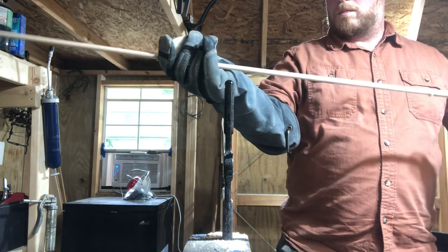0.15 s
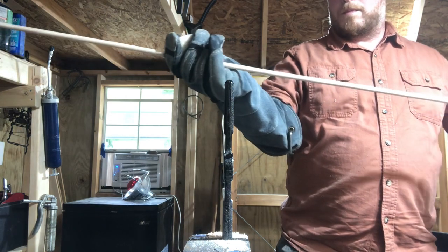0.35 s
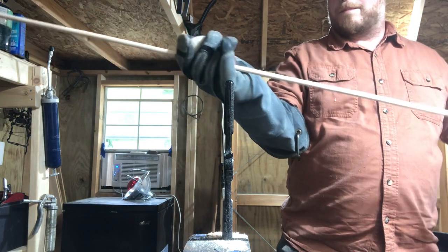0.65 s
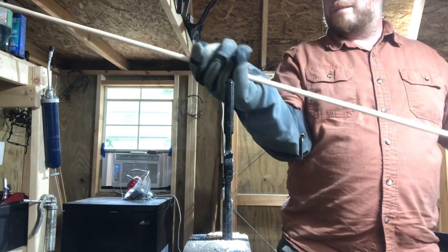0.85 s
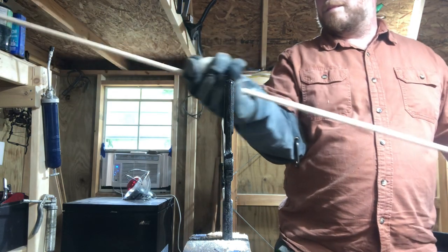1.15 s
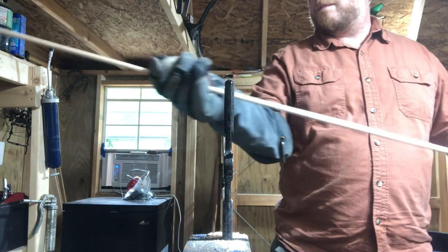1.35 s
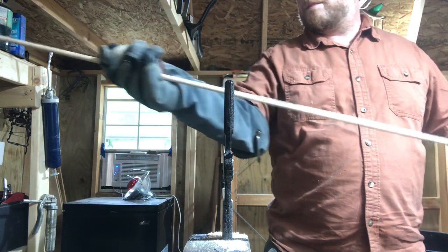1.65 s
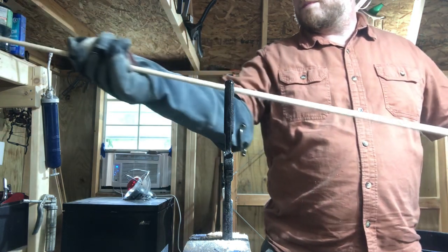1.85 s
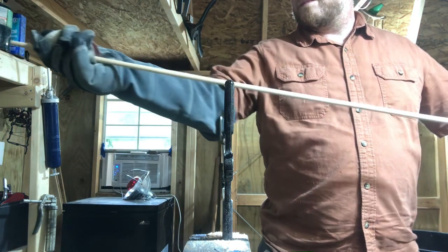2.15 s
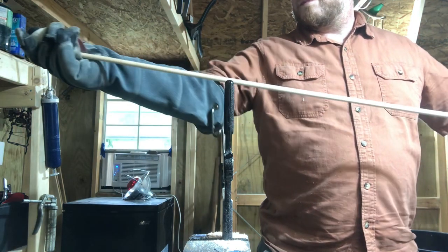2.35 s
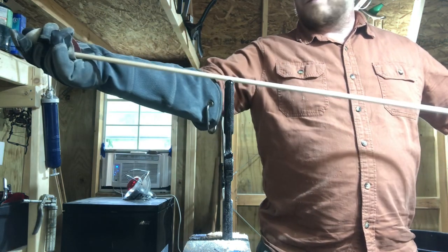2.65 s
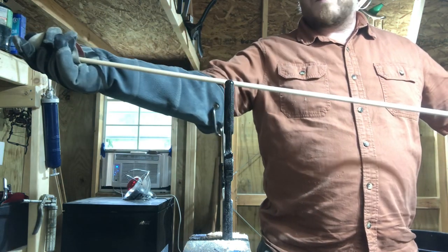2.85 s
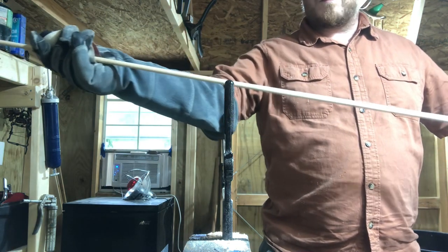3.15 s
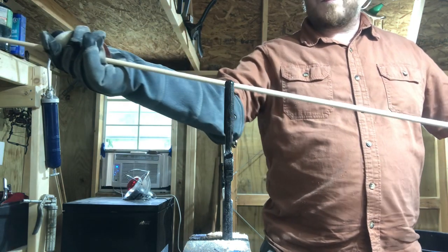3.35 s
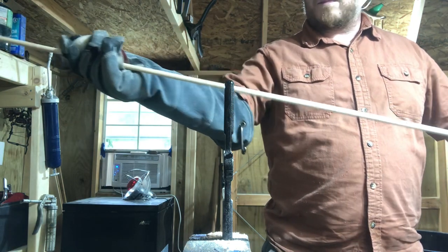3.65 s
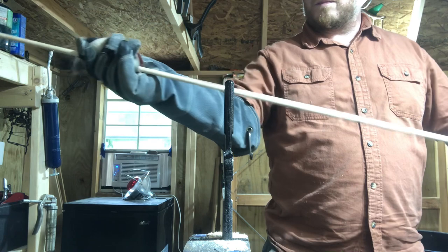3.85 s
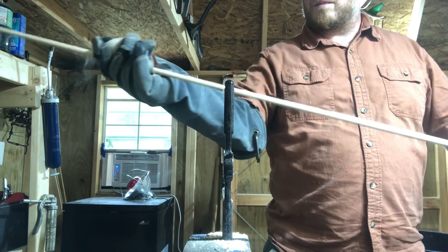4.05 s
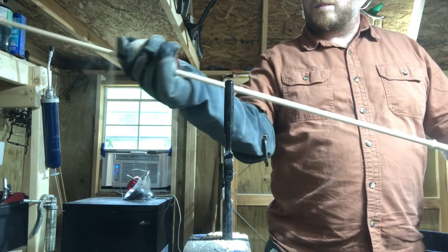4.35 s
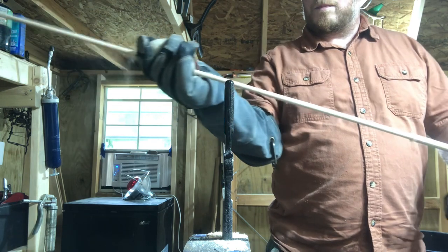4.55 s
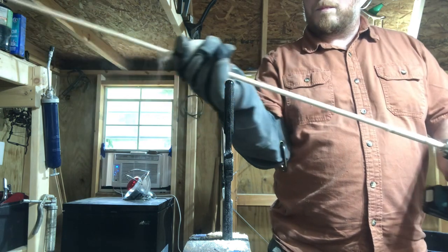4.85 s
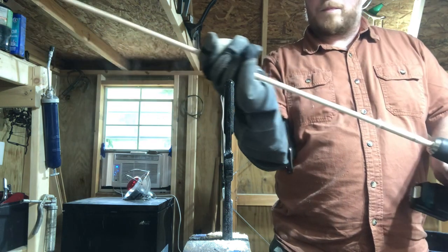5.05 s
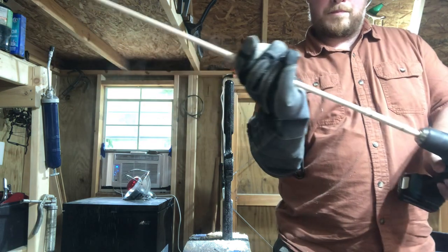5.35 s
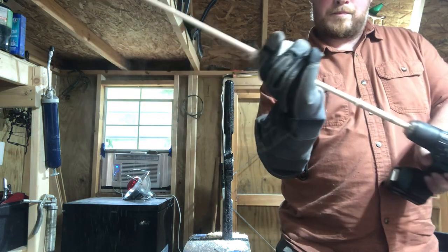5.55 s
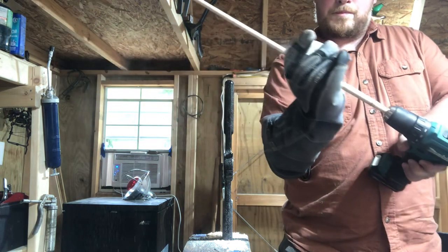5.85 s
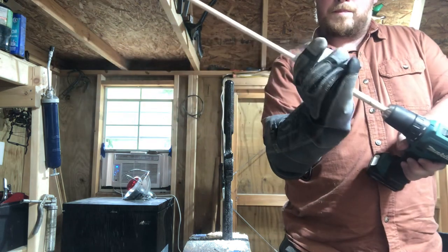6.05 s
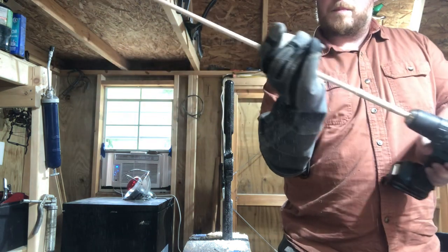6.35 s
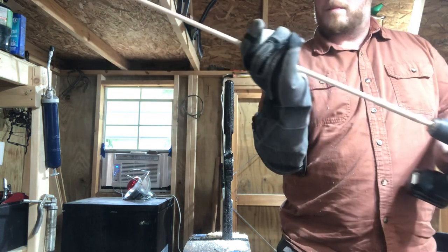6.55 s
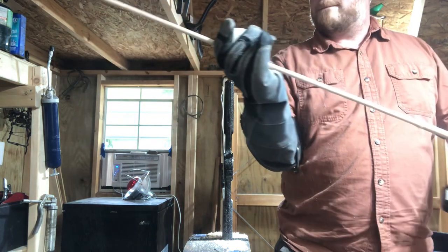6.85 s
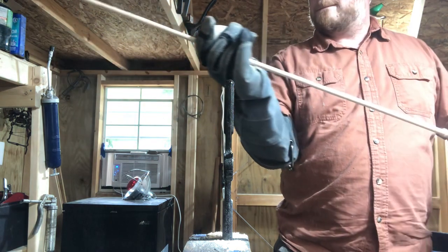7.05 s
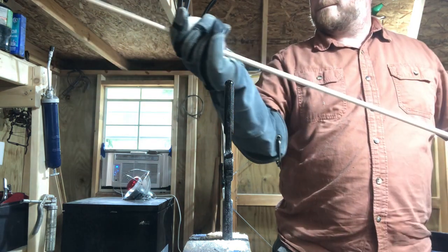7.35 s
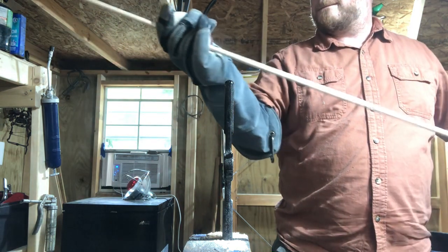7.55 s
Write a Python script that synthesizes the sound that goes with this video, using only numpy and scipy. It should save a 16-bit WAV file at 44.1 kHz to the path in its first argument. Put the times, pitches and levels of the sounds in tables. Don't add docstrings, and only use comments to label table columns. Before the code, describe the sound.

A cordless drill cuts out, loose ticks and paper rustle follow, then it clicks back on, spinning a dowel through sandpaper with gritty whining roar.

```python
import sys
import numpy as np
from scipy import signal
from scipy.fft import rfft, irfft, next_fast_len
from scipy.io import wavfile
from scipy.ndimage import uniform_filter1d, map_coordinates

SR = 44100
rng = np.random.default_rng(int(sys.argv[2]) if len(sys.argv) > 2 else 0)


def volts_from_db(level):
    exponent = np.asarray(level, float) / 20
    return 10 ** exponent


def unload_audio(sound):
    columns = np.transpose(np.atleast_2d(sound))
    steps = np.round(np.clip(columns, -1, 1) * 32767)
    wavfile.write(sys.argv[1], SR, steps.astype(np.int16))


N = 340011
TIME = np.arange(N) / SR
PINION_TEETH = 12
CHUCK_GEARING = 15

# pitch_hz, density_db [dB per Hz]
PAPER_COLOUR = [(350, -32), (600, -1), (1650, -4), (2400, -8.5), (3230, -14), (4970, -11), (7300, -9),
                (8300, -22), (10500, -28), (11800, -36), (15700, -44)]


def unit(x):
    return x / np.sqrt(np.mean(x ** 2) + 1e-20)


def along(points, hz):
    f, v = np.transpose(points)
    return np.interp(np.log(hz + 1), np.log(f + 1), v)


def curves(rows):
    s, *columns = np.transpose(rows)
    return [np.interp(TIME, s, column) for column in columns]


def wobble(rate):
    knots = rng.standard_normal(int(N * rate / SR) + 4)
    return map_coordinates(knots, [TIME * rate])


def filtered(x, response):
    size = next_fast_len(N + SR // 2)
    hz = np.fft.rfftfreq(size, 1 / SR)
    return irfft(rfft(x, size) * response(hz), size)[..., :N]


def patches(shape, bins):
    field = uniform_filter1d(rng.standard_normal(shape), size=bins, axis=0)
    return unit(uniform_filter1d(field, size=14, axis=1))


def drill():
    # time_s, mesh_hz
    mesh_pitch = [(0, 3720), (1.3, 3790), (1.7, 3800), (1.9, 3815), (2.45, 3822), (2.66, 3842), (2.9, 3796),
                  (3.3, 3799), (4.0, 3768), (4.9, 3763), (5.2, 3775), (5.45, 3740), (5.75, 3760),
                  (6.08, 3699), (6.3, 3744), (6.75, 3755), (7.2, 3745), (7.71, 3710)]
    # time_s, level_db
    whine_level = [(.3, -60), (1.3, -44), (1.55, -46), (1.8, -37), (2.75, -36.5), (3.3, -38.5), (3.6, -43),
                   (3.8, -37), (3.9, -48), (4.3, -55), (4.55, -35), (5.2, -33), (5.5, -39), (6.2, -41),
                   (6.6, -35), (6.97, -35), (7.1, -45), (7.71, -51)]
    # centre_s, change_db, half_length_s
    shades = [(2.1, -3, .07), (2.95, -8, .06), (3.4, -7, .03), (3.6, -5, .05), (5.63, -7, .03),
              (5.83, -12, .06), (6.19, -7, .04), (6.47, -4, .04), (6.85, -5, .03), (7.22, -9, .05)]
    # time_s, facing [0-1]
    swing = [
        (0, 0.34),
        (4.3, 0),
        (4.75, 1),
        (7.71, 0.53),
    ]

    speed, coasting = throttle()
    mesh_hz = curves(mesh_pitch)[0] * speed
    whine_db = curves(whine_level)[0]
    for s, db, half_s in shades:
        whine_db = whine_db + db * np.exp(-((TIME - s) / half_s) ** 2)
    whine_db = whine_db - 18 * coasting - 70 * (1 - speed)
    turns = np.cumsum(mesh_hz) / PINION_TEETH / SR
    facing = np.clip(curves(swing)[0], 0, 1)
    running = np.clip(mesh_hz / 3700, 0, 1) ** 6
    return whine(turns, whine_db, running, facing) + sanding(turns, facing, effort(speed))


def throttle():
    # release_s, press_s, speed_lost [share], slowing_s
    pauses = [
        (.316, 1.088, 1, .04),
        (4.29, 4.616, .22, .13),
    ]
    pick_up_s = 0.043
    speed, coasting = np.ones(N), np.zeros(N)
    for off, on, lost, slowing_s in pauses:
        fall = lost * (1 - np.exp(-np.clip(TIME - off, 0, on - off) / slowing_s))
        speed = speed - fall * np.exp(-np.clip(TIME - on, 0, None) / pick_up_s)
        coasting = coasting + (TIME > off) * (TIME < on)
    return np.clip(speed, 1e-4, 1), uniform_filter1d(coasting, size=900)


def effort(speed):
    # time_s, grip_db [on the paper], whip_db [of the free dowel]
    hold = [(0, -1.5, -1.5), (.32, -3.5, 1.5), (1.2, 0.5, 1), (1.55, 1, 1), (2.07, -1.5, -2),
            (2.6, -2.5, 1), (2.85, -1.5, 0.5), (3.3, -1, 0.5), (4.1, 0, 2.5), (4.5, 0, 1.5), (4.8, 0, 0.5),
            (5.6, 0, 2), (5.85, -1, 0.5), (6.05, -0.5, 0.5), (6.3, -.5, -0.5), (7.0, -1, -3),
            (7.3, -0.5, -0.5), (7.71, 0, 0)]
    # time_s, jolt_db
    jolts = [(.316, 4.5), (1.1, 6), (1.17, 6.5), (1.28, 3), (1.42, 4), (2.82, 7), (3.16, 0), (4.22, 2.5),
             (5.15, 0), (5.59, -2), (5.87, 3), (6.05, 7.5), (6.16, 5), (7.28, 3)]
    # level_db, by_grip [dB per dB], by_whip [dB per dB], speed_power, jolt_share
    layers = [
        (-38.5, 0.5, 1.26, 0.96, 1),
        (-35, .5, 0.93, 1.36, 0.11),
        (-32, 1.27, 0.41, 1.35, 0.12),
        (-31, 1.49, -0.05, 1.57, 0.06),
    ]
    jolt_s, uneven_db = 0.012, 0.61

    grip, whip = curves(hold)
    jolt = np.zeros(N)
    for s, db in jolts:
        jolt += db * np.exp(-((TIME - s) / jolt_s) ** 2) * (speed > 0.01)
    levels = []
    for db, by_grip, by_whip, power, share in layers:
        pressed = db + by_grip * grip + by_whip * whip
        driven = power * 20 * np.log10(speed) + share * jolt
        levels.append(pressed + driven + uneven_db * wobble(22))
    return levels


def whine(turns, whine_db, running, facing):
    # order [per motor turn], away_db, facing_db
    orders = [(13 / 15, -63, -68), (14 / 15, -70, -65), (1, -65, -62), (16 / 15, -70, -66), (2, -70, -60),
              (31 / 15, -70, -61), (5, -58, -47), (6, -58, -48), (23, -62, -52), (24, -54, -53),
              (30, -72, -63), (36, -78, -72)]
    mesh_phase = 2 * np.pi * PINION_TEETH * turns + 0.35 * wobble(50)
    tones = volts_from_db(whine_db + 2.5 + 1.7 * wobble(45)) * np.sin(mesh_phase)
    for order, away_db, facing_db in orders:
        level_db = away_db + (facing_db - away_db) * facing + 3 * wobble(8)
        tone = np.sin(2 * np.pi * (order * turns + rng.random()))
        tones = tones + running * volts_from_db(level_db + 3) * tone
    return tones


def sanding(turns, facing, levels):
    # pitch_hz, density_db [dB per Hz]
    colour = [(53, -66), (90, -32.5), (301, -13.5), (382, -15.5), (1010, -5), (1120, -7.5), (1850, -1),
              (2100, -5.5), (3230, -3), (3760, -1), (4370, -5), (6880, -3), (8360, -14.5), (10600, -16.5),
              (15600, -37.5)]
    # pitch_hz, width_hz, away_db, facing_db
    body = [(257, 89, 1, 3), (380, 61, -4.5, -3), (663, 74, 0.5, 2.5), (1020, 54, 4.5, 7),
            (1272, 290, 5, 6.5), (1490, 37, -3.5, -1.5), (1620, 120, 5, -1), (1850, 220, -1.5, 4.5),
            (2318, 97, 6.5, 2.5), (2620, 87, -0.5, 2.5), (3330, 500, -3, -0.5), (4140, 250, 1, 2.5),
            (4580, 105, 4, 4.5), (4960, 500, 3, 8), (6310, 400, 4.5, 1.5), (7020, 1070, 5, 3),
            (7380, 140, 3.5, 0), (7850, 300, 4.5, 4), (10200, 2700, 4.5, 2), (11700, 2300, 0.5, -6.5),
            (14900, 2000, 8, 5.5), (15800, 800, 2, -2)]
    edges = [
        1400,
        2900,
        5600,
    ]

    def above(hz, edge):
        return 1 / (1 + (edge / (hz + 1)) ** 16)

    def layer_share(hz, k):
        power = np.ones(len(hz))
        if k > 0:
            power = power * above(hz, edges[k - 1])
        if k < len(edges):
            power = power * (1 - above(hz, edges[k]))
        return np.sqrt(power)

    def body_db(hz, column):
        return sum(row[column] / (1 + (2 * (hz - row[0]) / row[1]) ** 2) for row in body)

    chuck = 2 * np.pi * turns / CHUCK_GEARING
    contacts = standing(grit(spread_db=1.9, patchy_db=1), depth_db=1.95)
    out = np.zeros(N)
    for k, level_db in enumerate(levels):
        beat_db = 0.41 * np.sin(chuck + k) + 0.56 * np.sin(2 * chuck + 3 * wobble(2))
        beat_db += 0.4 * np.sin(CHUCK_GEARING * chuck)
        beat_db += 0.1 * wobble(25) + 0.16 * wobble(120)
        rubbed = volts_from_db(beat_db) * np.roll(contacts, k * SR)

        def heard(column):
            return unit(filtered(rubbed, lambda hz: layer_share(hz, k)
                                 * volts_from_db(along(colour, hz) + body_db(hz, column))))

        away, toward = heard(2), heard(3)
        out += volts_from_db(level_db) * (away + (toward - away) * facing)
    return out


def grit(spread_db, patchy_db):
    size_db = spread_db * np.minimum(rng.exponential(size=N), 5)
    contacts = rng.standard_normal(N) * volts_from_db(size_db)
    z = signal.stft(contacts, nperseg=512)[2]
    gain = volts_from_db(patchy_db * patches(z.shape, bins=5))
    return signal.istft(z * gain, nperseg=512)[1][:N]


def standing(x, depth_db):
    z = signal.stft(x, nperseg=2048)[2]
    gain = volts_from_db(depth_db * patches(z.shape, bins=2))
    return signal.istft(z * unit(gain), nperseg=2048)[1][:N]


def trigger():
    # start_s, peak_db, knock_db [re peak], knock_hz, t60_s
    click = [
        (1.0887, -24, -20, 950, .012),
    ]
    # pitch_hz, level_db, t60_s
    clunk = [(668, -13, .07), (1270, -12, .06), (1700, -3, .014), (2050, 0, .014), (5200, -26, .008),
             (7000, -24, .008)]
    buzz_db = curves([(1.074, -95), (1.081, -62), (1.088, -52), (1.091, -95)])[0]
    buzz = volts_from_db(buzz_db) * np.sin(2 * np.pi * 2100 * TIME)
    return buzz + strike(click, clunk, crack=0.58)


def handling():
    # time_s, level_db
    rustle = [(0.36, -57), (0.404, -63), (0.746, -76), (0.96, -78), (0.99, -72), (1.08, -74)]
    # start_s, peak_db, knock_db [dowel, re peak], knock_hz, t60_s
    ticks = [(0.4279, -50, -13, 1020, 0.012), (0.448, -42, -13, 1340, 0.012),
             (0.4716, -35.5, -16, 1620, 0.013), (0.4786, -40, -12, 705, 0.01),
             (0.5083, -40, -8, 705, 0.012), (0.5492, -32, -10, 1660, 0.006), (0.5655, -46, -4, 982, 0.012),
             (0.6444, -57, -8, 759, 0.012), (0.6764, -53, -5, 1880, 0.012), (0.689, -48, -9, 1490, 0.013),
             (0.692, -47, -5, 1890, 0.013), (0.7357, -41.5, -15, 1010, 0.013),
             (0.7434, -55, -13, 703, 0.012), (0.7494, -53, -15, 703, 0.012), (0.7564, -59, -5, 1540, 0.012),
             (0.9757, -59, -4, 1090, 0.012), (0.9854, -58, 0, 805, 0.012)]
    # pitch_hz, level_db, t60_s
    chuck_modes = [(4300, -10, 0.0091), (4900, -5, 0.015), (5400, -5, .008), (6150, 2, .007),
                   (7000, -7, 0.01), (7760, -5, .009), (9400, -12, .006), (10350, -8, .008)]
    level_db = curves([(0.34, -95), *rustle, (1.12, -95)])[0]
    paper = unit(filtered(grit(spread_db=2, patchy_db=1.5), lambda hz: volts_from_db(along(PAPER_COLOUR, hz))))
    return volts_from_db(level_db + 1.7 * wobble(60.8)) * paper + strike(ticks, chuck_modes, crack=1.8)


def strike(hits, modes, crack):
    out, t = np.zeros(N + SR), np.arange(SR // 8) / SR
    snap = unit(filtered(rng.standard_normal(N),
                         lambda hz: volts_from_db(along(PAPER_COLOUR, hz)) * hz / (hz + 3000)))
    attack = 1 - np.exp(-t / 0.00051)
    for s, db, knock_db, knock_hz, t60 in hits:
        at = round(s * SR)
        ring = np.zeros(len(t))
        for hz, level_db, life_s in modes:
            ring += volts_from_db(level_db + rng.normal(0, 2) - 60 * t / life_s) * np.sin(2 * np.pi * hz * t)
        ring = (ring + crack * volts_from_db(-60 * t / t60) * snap[at:at + len(t)]) * attack
        knock = volts_from_db(knock_db - 60 * t / (1.8 * t60)) * np.sin(2 * np.pi * knock_hz * t)
        out[at:at + len(t)] += volts_from_db(db) * (ring / np.abs(ring).max() + knock)
    return out[:N]


def shed(x):
    # pitch_hz, t60_s
    decay = [
        (200, 0.46),
        (2000, 0.27),
        (7000, 0.25),
        (14000, 0.24),
    ]
    hz, t, z = signal.stft(rng.standard_normal(SR // 3), SR, nperseg=256)
    fade = volts_from_db(-60 * t / along(decay, hz)[:, None])
    tail = signal.istft(z * fade, SR, nperseg=256)[1]
    delayed = np.pad(x, (200, 0))
    return signal.fftconvolve(delayed, tail / np.linalg.norm(tail))[:N]


def air():
    # pitch_hz, density_db [dB per Hz]
    murmur = [(15, -50), (30, -24), (48, -8), (62, -2), (80, -3), (105, -0.5), (190, -5.5), (310, -7.5),
              (500, -7), (1000, -16), (2100, -24), (5000, -26), (7500, -29), (10000, -31), (15700, -40)]
    rush = unit(filtered(grit(spread_db=0, patchy_db=1), lambda hz: volts_from_db(along(murmur, hz))))
    whistle = np.sin(2 * np.pi * 8700 * TIME + 1.2 * wobble(200))
    return volts_from_db(-67.5) * rush + volts_from_db(-89 + 3 * wobble(25)) * whistle


def scene():
    knocks = trigger() + handling()
    mix = drill() + knocks + volts_from_db(-6) * shed(knocks) + air()
    return np.tile(mix, (2, 1))


def side_noise(mid):
    # time_s, centre_hz
    flares = [(.103, 11800), (1.334, 4850), (1.334, 6950), (1.345, 14800), (1.38, 5200), (1.38, 15000),
              (2.286, 4850), (2.286, 11650), (2.82, 4900), (2.82, 6600), (2.843, 4900), (2.843, 6600),
              (2.866, 14050), (3.052, 10300), (3.075, 11600), (3.377, 11100), (3.4, 11000), (3.563, 14100),
              (3.702, 13150), (3.911, 7600), (3.911, 15300), (4.538, 12400), (4.677, 11000), (5.211, 6300),
              (5.211, 9700), (5.722, 10250), (5.745, 8700), (5.745, 13400), (7.232, 7600), (7.487, 7800)]
    side, size, width_hz = np.zeros(N), 2048, 1350
    hop, first = 1024, 446
    hz = np.fft.rfftfreq(size, 1 / SR)
    window = signal.windows.kaiser_bessel_derived(size, 4 * np.pi)
    for s, centre_hz in flares:
        start = first + round((s * SR - first) / hop - 1) * hop
        frame = slice(start, start + size)
        in_band = np.abs(hz - centre_hz) < width_hz / 2
        band = np.abs(rfft(mid[frame] * window)) * in_band
        phase = np.exp(2j * np.pi * rng.random(len(hz)))
        side[frame] += window * irfft(band * phase)
    return side


def roll_off(x):
    return signal.sosfilt(signal.butter(12, 15770, fs=SR, output="sos"), x)


def record(dry):
    mid = filtered(dry[0], lambda hz: hz < 15750)
    side = side_noise(mid)
    return roll_off(np.array([mid + side, mid - side]))


dry = scene()
out = record(dry)
unload_audio(out)
```